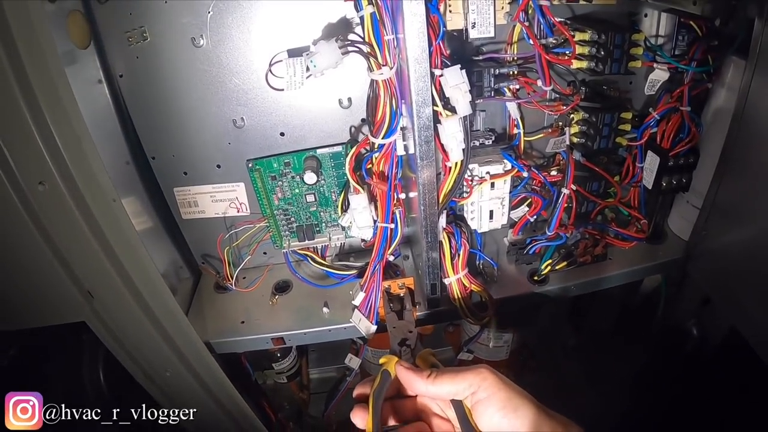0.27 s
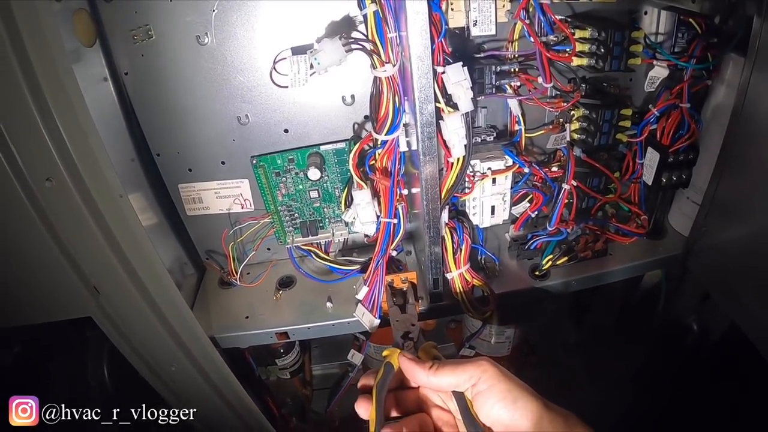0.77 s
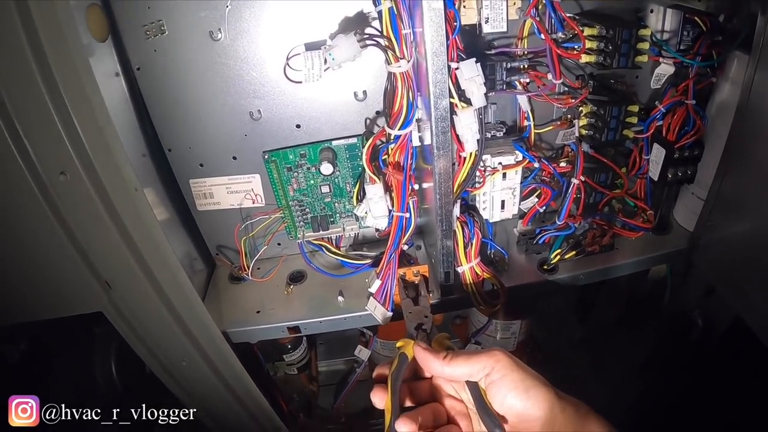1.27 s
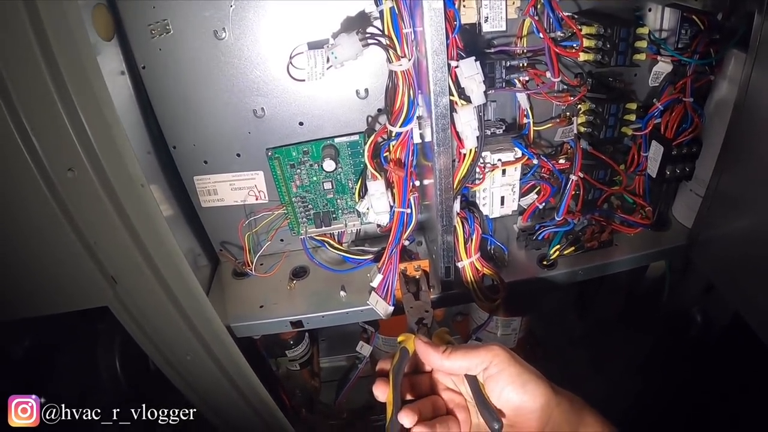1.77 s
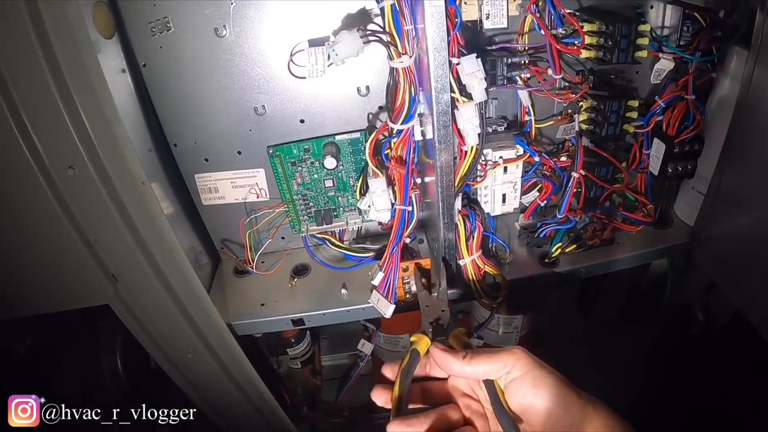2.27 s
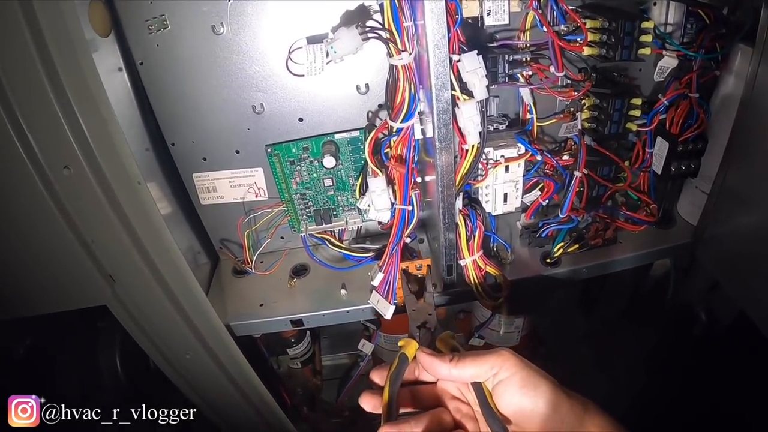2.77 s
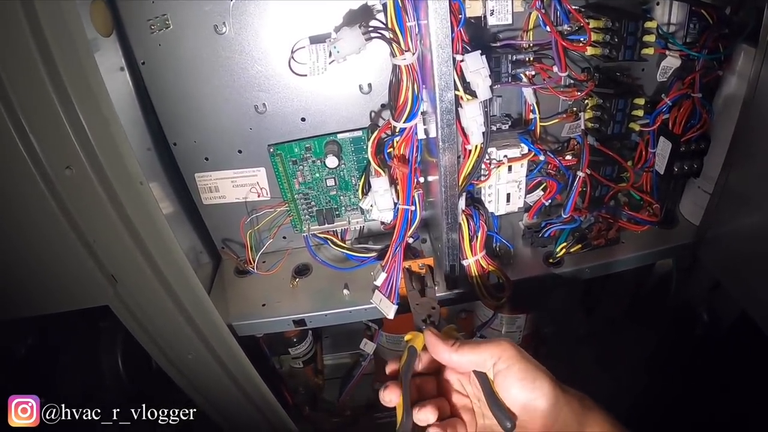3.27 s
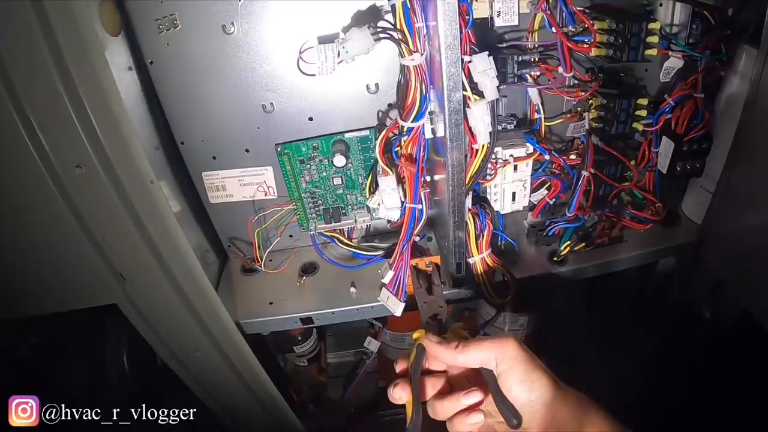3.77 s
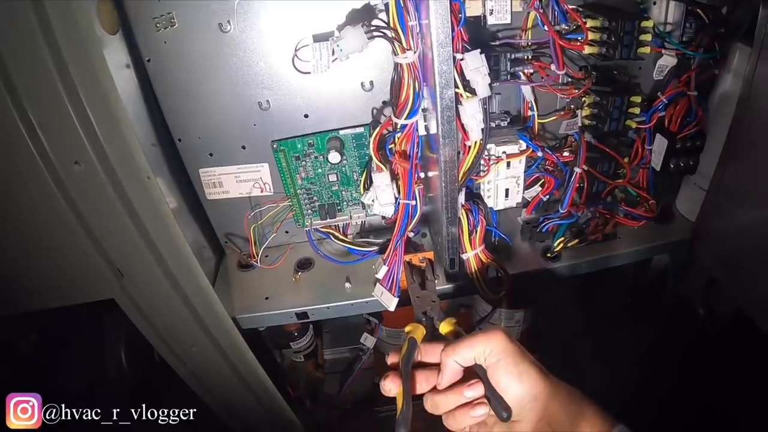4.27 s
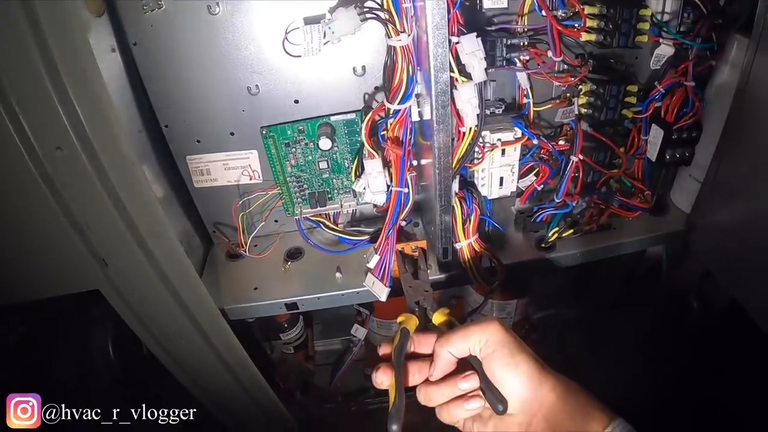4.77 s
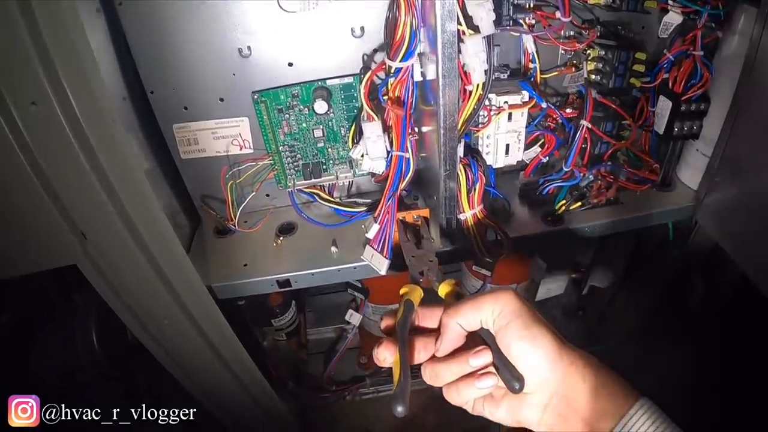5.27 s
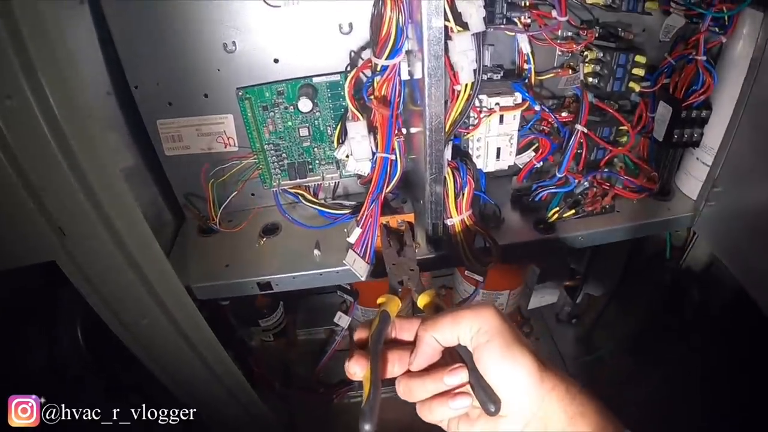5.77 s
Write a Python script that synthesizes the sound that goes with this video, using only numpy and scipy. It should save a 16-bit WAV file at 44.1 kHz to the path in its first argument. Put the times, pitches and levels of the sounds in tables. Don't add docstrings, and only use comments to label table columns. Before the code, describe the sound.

Close by an open heating and cooling cabinet, low fan drone and soft turbulent air run throughout, very slowly growing. A thin, fast squeaking from the belt flutters above, with a light hiss each turn. Pliers tick irregularly against wires and metal. Finally a contactor snaps shut with a sharp, boxy knock, followed at once by a low thump and a brief harsh motor roar.

```python
import sys
import numpy as np
from scipy import signal
from scipy.io import wavfile

SR = 44100
rng = np.random.default_rng(int(sys.argv[2]) if len(sys.argv) > 2 else 0)


def invert_db(level):
    return 10 ** (np.asarray(level, dtype=float) / 20)


def unload_audio(sound):
    columns = np.transpose(np.atleast_2d(sound))
    steps = np.round(np.clip(columns, -1, 1) * 32767)
    wavfile.write(sys.argv[1], SR, steps.astype(np.int16))


N = 265526


def rms_one(x):
    return x / np.sqrt(np.mean(x ** 2) + 1e-20)


def at_hz(points, hz):
    table = np.array(points)
    return np.interp(np.log(hz), np.log(table[:, 0]), table[:, 1])


def pan(x, db):
    return x * invert_db(np.array([[db / 2], [-db / 2]]))


def drift(rate_hz, size=N):
    r = np.exp(-2 * np.pi * rate_hz / SR)
    white = rng.standard_normal(size + SR // 2)
    run_in = signal.lfilter([1], [1, -2 * r, r * r], white)
    return rms_one(run_in[SR // 2:])


def ring(force, modes):
    out = 0
    for hz, db, t60 in modes:
        r = invert_db(-60 / (t60 * SR))
        w = 2 * np.pi * hz / SR
        gain = invert_db(db) * np.sin(w)
        out = out + signal.lfilter([0, gain], [1, -2 * r * np.cos(w), r * r], force + 1e-18)
    return out


def narrow(phase, width_hz, steady):
    size = len(phase)
    wander = drift(width_hz, size) * np.cos(phase) + drift(width_hz, size) * np.sin(phase)
    return np.sqrt(2 * steady) * np.sin(phase) + np.sqrt(1 - steady) * wander


# (frequency [Hz], left-right likeness [0-1])
COHERENCE = [(60, 1.0), (240, .9995), (400, 1), (620, 0.84), (1000, 0.83), (2600, .7), (4200, .5),
             (6000, 0.082)]
# (frequency [Hz], left over right [dB])
BALANCE = [(60, 0), (240, 0), (490, 0.5), (980, 1), (1980, 3.0), (3970, 2), (7990, -1.5), (12000, -.7)]


def banded_noise(spectrum, patchy_db, apart, size=N):
    out = 0
    together = drift(6.0, size)
    edges = 22 * 2 ** np.arange(0, 9.6, 1 / 3)
    white = rng.standard_normal((2, 2, size + SR // 4))
    for k, (low, high) in enumerate(zip(edges, edges[1:])):
        sos = signal.butter(2, [low, high], "band", fs=SR, output="sos")
        mid, side = signal.sosfilt(sos, white[k % 2])[:, SR // 4:]
        hz = np.sqrt(low * high)
        unlike = np.clip(apart * (1 - at_hz(COHERENCE, hz)), 0, 1)
        flicker_db = patchy_db * (.7 * together + np.roll(together, 9000 * k))
        gain = invert_db(at_hz(spectrum, hz) + flicker_db)
        both = np.sqrt(2 - unlike) * mid + np.sqrt(unlike) * side * [[1], [-1]]
        out = out + pan(gain * both, at_hz(BALANCE, hz))
    return rms_one(out)


# (frequency [Hz], density [dB per Hz])
AIR_SPECTRUM = [(15, -42.5), (31, -18.5), (52, -0.5), (87, -7), (125, 0), (200, -9), (300, -13.5),
                (640, -25.5), (966, -26.5), (2000, -39), (4400, -43), (7800, -54), (10000, -61),
                (15500, -80.5)]


def air_rush():
    t = np.arange(N) / SR
    creep_db_per_s, settle_db, settle_s = 0.1731, -3, .2
    rush_db = -37 + creep_db_per_s * t + settle_db * np.exp(-t / settle_s)
    return invert_db(rush_db + 12) * banded_noise(AIR_SPECTRUM, patchy_db=0.76, apart=1.01)


# (frequency [Hz], width [Hz], steady share [0-1], level [dB rms], left over right [dB])
HUM_TONES = [(65.1, 4.0, .4, -32.5, 0), (130.3, 3.5, .45, -30, 0), (117.1, 2.64, .2, -31, 0),
             (119.8, 1.2, .6, -36.5, 0), (186.7, 9.0, 0.01, -34.5, -1.5), (240.8, 3.0, .85, -34.5, -1.5),
             (360.5, 2.5, .5, -46.5, 0.5), (605, 5, .1, -52.5, 4), (832, 14, 0, -52, -0.5),
             (953, 100, 0, -49.5, 3), (1657, 11, 0, -60.5, 2), (2424, 20, 0, -65.5, 2.5)]


def blower_hum():
    t = np.arange(N) / SR
    out = 0
    for hz, width_hz, steady, db, side_db in HUM_TONES:
        phase = 2 * np.pi * hz * t + rng.uniform(0, 2 * np.pi)
        out = out + pan(invert_db(db) * narrow(phase, width_hz, steady), side_db)
    return out


BELT_TURNS_PER_S = 7.75
# (start [turns], length [turns], start frequency [Hz], end frequency [Hz], level [dB])
BELT_CHIRPS = [
    (.0, 0.38, 3660, 4072, -52),
    (.32, .30, 4080, 4416, -55.5),
    (.34, 0.37, 4540, 5000, -56),
    (.68, .28, 2545, 2575, -54),
    (.72, .22, 2845, 2907, -61),
]
# (frequency [Hz], level [dB], decay time t60 [s])
PULLEY_MODES = [(2559, 0, .05), (2880, -5, .05), (3380, -2.5, .05), (3700, -3, .05), (3830, -2, 0.065),
                (4074, 1.0, .07), (4280, -2, 0.061), (4720, -1, .05), (4930, -1, 0.069)]


def belt_chirps():
    turns = BELT_TURNS_PER_S * np.arange(N) / SR + 1
    out = 0
    for start, length, hz0, hz1, db in BELT_CHIRPS:
        turn, part = np.divmod(turns - start, 1)
        along = np.clip(part / length, 0, 1)
        luck = rng.standard_normal((60, 2))[turn.astype(int)]
        glide_hz = hz1 - hz0
        scatter_hz = .22 * (glide_hz + 60) * luck[:, 0]
        hz = hz0 + glide_hz * along ** .8 + scatter_hz
        bite = np.clip(part / .05, 0, 1) * invert_db(-45 * np.maximum(part - 0.59 * length, 0))
        grip = bite * invert_db(db + 1.1 * luck[:, 1])
        phase = 2 * np.pi * np.cumsum(hz) / SR
        blur_hz = 110 + .25 * glide_hz
        direct = narrow(phase, blur_hz, steady=0)
        reflected = narrow(phase, blur_hz, steady=0)
        out = out + pan(grip * (direct + 0.55 * reflected * [[1], [-1]]), at_hz(BALANCE, hz0))
    return .9 * out + invert_db(-41) * ring(out, PULLEY_MODES)


def belt_seam():
    turns = BELT_TURNS_PER_S * np.arange(N) / SR + 1
    turn, part = np.divmod(turns - .27, 1)
    luck_db = 3.0 * rng.standard_normal(60)[turn.astype(int)]
    brush = np.clip(part / .04, 0, 1) * invert_db(-59.5 + luck_db - 33 * part)
    sos = signal.butter(3, [4800, 8400], "band", fs=SR, output="sos")
    hiss = signal.sosfilt(sos, rng.standard_normal((2, N)))
    return pan(brush * rms_one(hiss), -3.0)


# (time [s], peak level [dB], decay time t60 [s], softness [0-1])
TOOL_TOUCHES = [(1.885, -33.5, .08, 1.0), (2.056, -48.5, .03, .0), (2.485, -38, .025, .0),
                (2.722, -46.5, .12, .0), (2.830, -34.5, 0.06, 0.2), (2.974, -41.5, .08, .0),
                (3.004, -28, .08, .0), (3.016, -32, .1, .8), (4.018, -47.5, 0.028, .0),
                (4.39, -47, 0.074, 0.1), (4.447, -35.5, 0.035, 0.94), (5.18, -46, .06, .0),
                (5.29, -50, .05, 0.04), (5.55, -49, .05, .0)]
# (frequency [Hz], density [dB per Hz])
SCUFF_SPECTRUM = [(150, -28.5), (310, -1.5), (700, -15.5), (1050, -6), (1600, -12), (3000, -13),
                  (7300, -16), (10000, -22), (15500, -32)]
# (frequency [Hz], level [dB], decay time t60 [s])
SHEET_MODES = [(306, 5, .07), (880, -9, .03), (1054, -5.5, .06), (1454, -9.5, 0.04)]


def tool_ticks():
    t = np.arange(N) / SR
    bright = banded_noise(SCUFF_SPECTRUM, patchy_db=0.0, apart=0.74)
    dull = rms_one(signal.sosfilt(signal.butter(2, 1800, fs=SR, output="sos"), bright))
    out, push = np.zeros((2, N)), np.zeros(N)
    for s, db, t60, softness in TOOL_TOUCHES:
        rise = .045 * t60
        since = t - s
        decay_db = 60 * np.maximum(since - rise, 0) / t60
        burst = np.clip(since / rise, 0, 1) * invert_db(db - decay_db)
        out += burst * ((1 - softness) * bright + softness * dull)
        push += softness * burst
    return out + invert_db(-18.5) * ring(push * rng.standard_normal(N), SHEET_MODES)


def strike(s, db, swell, chatter, modes, thrust):
    since = np.arange(N) / SR - s
    force = np.exp(-np.abs(since) / np.where(since < 0, swell, chatter))
    shared, own = rng.standard_normal(N), rng.standard_normal((2, N))
    struck = ring(force * (thrust + shared + .3 * own), modes)
    return invert_db(db) * struck / np.max(np.abs(struck))


# (frequency [Hz], level [dB], decay time t60 [s])
ARMATURE_MODES = [(1640, 4, 0.029), (3200, 4, 0.043), (6000, -17.5, .01), (11000, -10, .005)]
# (frequency [Hz], level [dB], decay time t60 [s])
CONTACT_MODES = [(1100, -8.5, .012), (1596, -3, 0.059), (2100, -5.5, 0.014), (2800, -6.5, .025),
                 (3550, -3.5, 0.011), (4240, -0.5, 0.011), (4720, -0.5, 0.012), (5600, -3.5, 0.011),
                 (6300, -6, .008), (7240, -2, 0.012), (9500, -8, 0.0054), (12500, -15, .005)]
# (frequency [Hz], level [dB], decay time t60 [s])
PANEL_MODES = [(126.3, -11, .35), (373, 1, 0.053), (453, -3, .04), (525, -2.5, 0.098), (1080, -8, 0.045),
               (1550, -10, 0.072)]


def contactor():
    pull_in = strike(5.7232, -20, swell=.0005, chatter=.0025, modes=ARMATURE_MODES, thrust=0)
    touch = strike(5.7400, -3, swell=.0009, chatter=.0014, modes=CONTACT_MODES, thrust=0)
    seat = strike(5.7422, -5, swell=.0003, chatter=.0004, modes=PANEL_MODES, thrust=4)
    return pan(pull_in + touch + seat, 1.5)


# (frequency [Hz], density [dB per Hz])
ROAR_SPECTRUM = [(88, -30), (150, -5.5), (257, -9.5), (464, -16), (559, -16), (708, -28.5), (911, -19.5),
                 (2870, -24.5), (3950, -28.5), (7800, -34.5), (9500, -39), (13000, -50), (14500, -70)]
# (frequency [Hz], width [Hz], level [dB])
SHELL_MODES = [(1520, 37, -25), (1880, 40, -21.5), (2410, 46, -20.5), (2916, 32, -19), (3850, 50, -20),
               (6230, 73, -25.5)]
# (frequency [Hz], width [Hz], level [dB])
MOUNT_MODES = [(47.24, 14, 2), (102, 14, 0), (143, 34, 1.5), (270, 50, -8.5)]


def compressor():
    first = round(5.7 * SR)
    t = np.arange(first, N) / SR

    def tone(hz, width_hz, steady):
        return narrow(2 * np.pi * hz * t, width_hz, steady)

    since = np.maximum(t - 5.745, 0)
    jolt = invert_db(-31.5 - 277 * since) * np.clip(since / 0.0029, 0, 1)
    spin_up_s, lag_s, ease_s, ease_db_per_s = 5.79, 0.02, 5.93, 80
    spun_db = -23 * np.exp(-np.maximum(t - spin_up_s, 0) / lag_s)
    eased_db = ease_db_per_s * np.maximum(t - ease_s, 0)
    spin = (t > spin_up_s) * invert_db(-22 + spun_db - eased_db)
    lurch = (1 - np.exp(-since / 0.011)) * invert_db(-14 - 30 * since)

    roar = banded_noise(ROAR_SPECTRUM, patchy_db=2.0, apart=.9, size=len(t))
    roar = roar + sum(invert_db(db) * tone(hz, width_hz, 0) for hz, width_hz, db in SHELL_MODES)
    strokes_db, rattle_db = 1.5 * drift(45, len(t)), 1.4 * drift(250, len(t))
    roar = roar * invert_db(strokes_db + rattle_db)

    free = t - 5.797
    whine = np.clip(free / 0.0062, 0, 1) * invert_db(-29.5 - 68 * free) * tone(3855, 45, 0.34)
    rock = sum(invert_db(db) * tone(hz, width_hz, 0.48) for hz, width_hz, db in MOUNT_MODES)
    out = invert_db(4.5) * (jolt + spin) * roar + invert_db(-6) * lurch * rock + whine
    return np.pad(out, [(0, 0), (first, 0)])


def scene():
    blower = air_rush() + blower_hum()
    belt = belt_chirps() + belt_seam()
    return blower + belt + tool_ticks() + contactor() + compressor()


def low_pass(x):
    return signal.sosfilt(signal.butter(12, 15700, fs=SR, output="sos"), x)


def record(dry):
    late = np.array([np.append(dry[0, :2], dry[0, :-2]), dry[1]])
    port = signal.butter(12, 8230, fs=SR, output="sos")
    below = signal.sosfiltfilt(port, late)
    heard = below + invert_db(-8.5) * (late - below)
    heard = heard * signal.windows.tukey(N, 300 / N)
    return low_pass(heard)


dry = scene()
out = record(dry)
unload_audio(out)
```